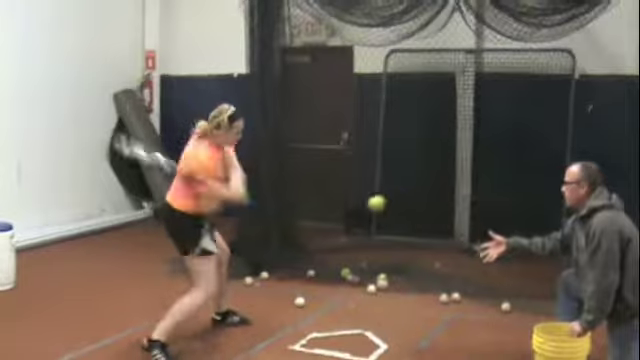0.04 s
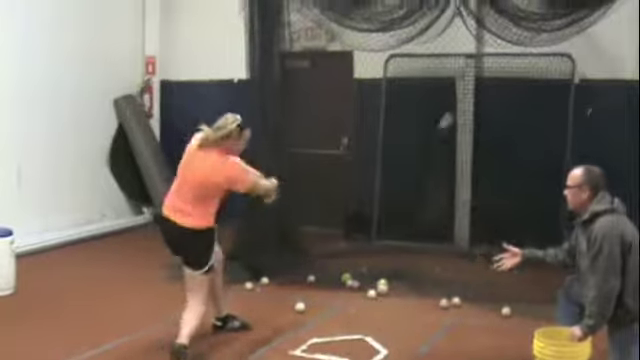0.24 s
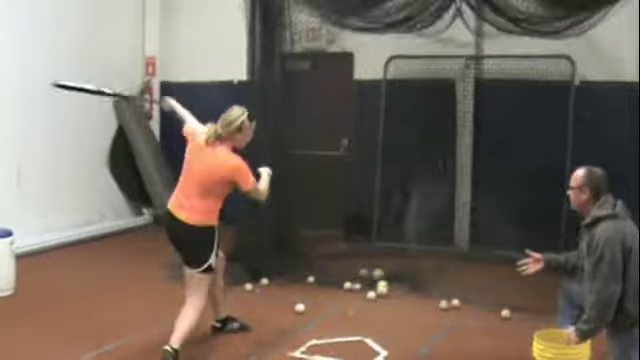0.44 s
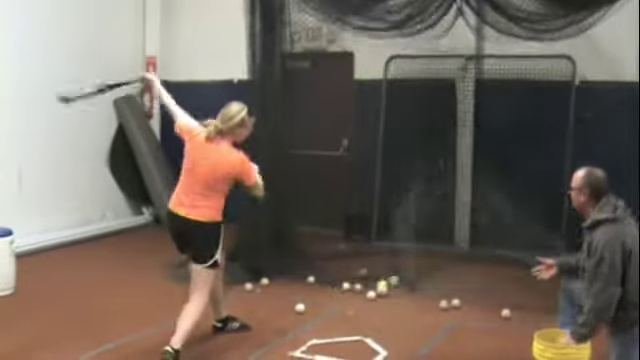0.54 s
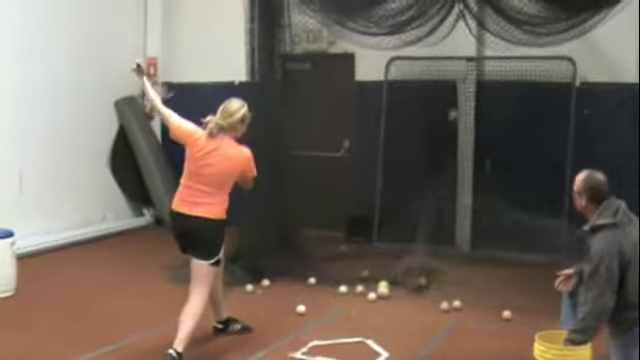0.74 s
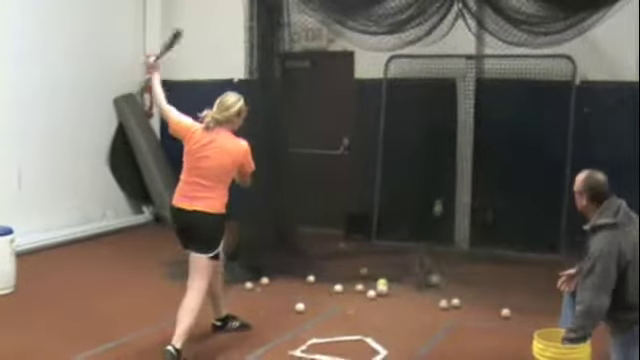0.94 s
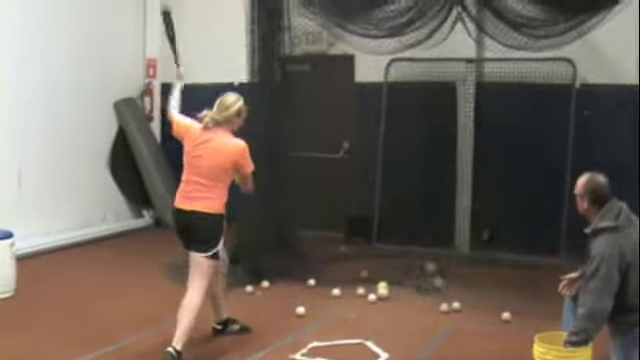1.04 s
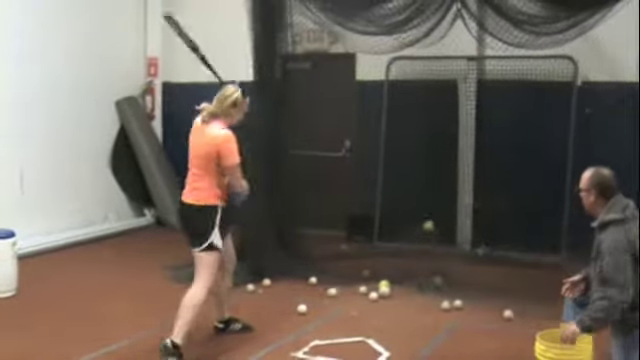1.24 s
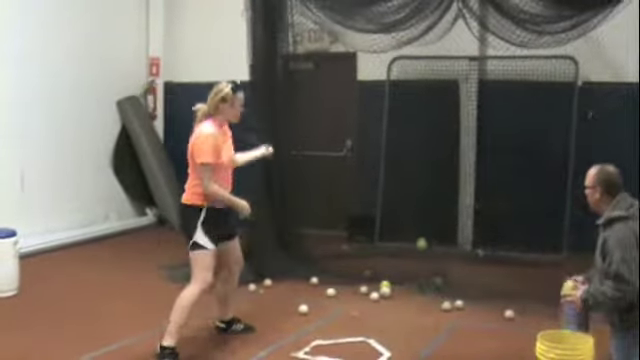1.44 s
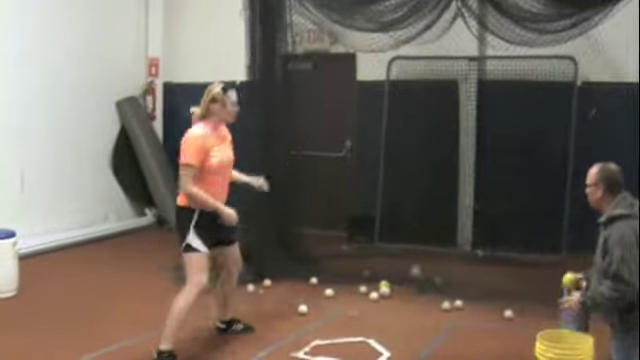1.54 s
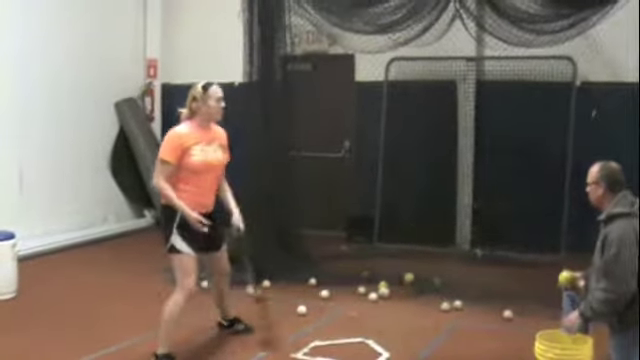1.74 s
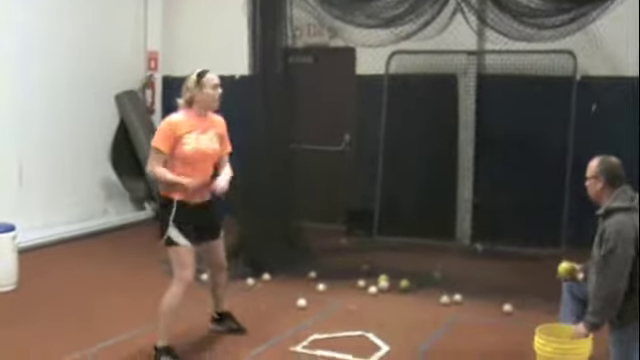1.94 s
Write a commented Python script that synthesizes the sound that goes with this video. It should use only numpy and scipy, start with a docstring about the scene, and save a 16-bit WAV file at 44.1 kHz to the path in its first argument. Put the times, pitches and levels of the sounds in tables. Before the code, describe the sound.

A loud metal bat crack hits a softball early on, ringing briefly and echoing through a large hard-walled hall; later the ball knocks on the floor, then bounces again more dully, over faint rustle and room tone.

```python
"""A bat cracks against a softball in a large, hard-walled batting hall.
The crack is a filtered click, the barrel's short ring a set of decaying sines; the hall, shaped noise
fading band by band, holds them for over a second, pressed flat by a fast limiter.
The ball bounces twice on the floor (thump, knock and tick), among soft thuds.
A faint rustle and steady room tone, both coloured noise, lie behind."""
import sys
import numpy as np
from scipy import signal
from scipy.fft import rfft, irfft
from scipy.io import wavfile
from scipy.ndimage import uniform_filter1d

SR = 44100
rng = np.random.default_rng(int(sys.argv[2]) if len(sys.argv) > 2 else 0)


def unload_audio(sound):
    """Save the sound as a 16-bit wav file, at the path given as the first command line argument."""
    columns = np.transpose(np.atleast_2d(sound))
    # keep every value between -1 and 1, then stretch to whole-number steps
    steps = np.round(np.clip(columns, -1, 1) * 32767)
    wavfile.write(sys.argv[1], SR, steps.astype(np.int16))


N = 88200

# Barrel modes. Each row: frequency in Hz, relative level in dB, t60 in s.
BARREL_MODES = [(645, 14, 0.057), (1100.5, 8, 0.064), (1172.6, 11, 0.046), (1732, 4, 0.012),
                (2375, 1.5, 0.014), (3287, 5.5, 0.01), (4580, -18, 0.0034), (5510, -1.5, 0.028),
                (6660, -14, 0.018), (8800, -5.5, 0.014)]
# Contact crack spectrum. Each row: frequency in Hz, relative level in dB.
CRACK_SPECTRUM = [(100, -36.5), (220, -15.5), (380, -8), (510, -9.5), (820, 2.5), (1450, -0.5),
                  (2800, -2.5), (4300, 0.5), (6500, -4), (9500, -7.5), (11500, -26), (16000, -31)]
# First reflections of the bat. Each row: delay in s, level in dB.
BAT_ECHOES = [(.009, -4.5), (.017, -14), (.0235, -11), (.028, -11)]
BARREL_LOW_CUT_HZ, CRACK_DB, CRACK_SPREAD_S = 540, 15, 0.00039
BAT_DIRECT_DB, BAT_HALL_DB = 4.5, 13.5


def bat():
    """The contact crack and the short ring of the barrel, thrown into the hall."""
    ring = cut(modes(BARREL_MODES), BARREL_LOW_CUT_HZ, "high", order=4)
    crack = amp(CRACK_DB) * click(CRACK_SPECTRUM)
    ring_paths = amp(BAT_DIRECT_DB) * reflections(0, BAT_ECHOES) + amp(BAT_HALL_DB) * hall()
    crack_near = reflections(0, BAT_ECHOES, CRACK_SPREAD_S)
    crack_paths = amp(BAT_DIRECT_DB) * crack_near + amp(BAT_HALL_DB) * hall()
    return through(ring, ring_paths) + through(crack, crack_paths)


def modes(table, size=4096):
    """A struck body: each mode is a sine losing 60 dB in its t60."""
    t = np.arange(size) / SR
    body = np.zeros(size)
    for hz, db, t60_s in table:
        decay = np.exp(-np.log(1000) * t / t60_s)
        body += amp(db) * unit(np.sin(2 * np.pi * hz * t) * decay)
    return body


# Hollow knock of ball on floor. Each row: frequency in Hz, relative level in dB.
KNOCK_SPECTRUM = [(60, -24), (150, -10.5), (310, 2.5), (430, -1.5), (680, 2.5), (900, -0.5), (1200, -1),
                  (1600, -11.5), (2400, -26.5), (3300, -22.5), (6000, -50), (16000, -83)]
# Gritty tick of the ball's cover on the floor. Each row: frequency in Hz, relative level in dB.
TICK_SPECTRUM = [(500, -27), (2400, -5), (4500, 4.5), (6800, 8), (9800, 2), (12000, -10), (16000, -37)]
# First reflections of a bounce, used by thumps too. Each row: delay in s, level in dB.
BOUNCE_ECHOES = [(.0074, -12), (0.0159, -3), (.0232, 1), (0.0379, -1.5), (.0455, -7), (0.051, -8)]
KNOCK_DULL_ABOVE_HZ, KNOCK_DIRECT_DB, KNOCK_HALL_DB = 880, -16, 10.5
TICK_DIRECT_DB, TICK_SCATTER_DB, TICK_HALL_DB, TICK_SPREAD_S = -29, -10, 9, 0.0011


def bounce(thump_db, knock_db, dull_db_per_octave, tick_db):
    """A thump, a hollow knock and a gritty tick; scattered echoes carry the last two into the hall."""
    colour = []
    for hz, db in KNOCK_SPECTRUM:
        octaves_above = max(np.log2(hz / KNOCK_DULL_ABOVE_HZ), 0)
        colour.append((hz, db - dull_db_per_octave * octaves_above))
    knock = amp(knock_db) * click(colour)
    tick = amp(tick_db) * click(TICK_SPECTRUM)

    near = scatter()
    knock_paths = reflections(KNOCK_DIRECT_DB, BOUNCE_ECHOES) + near
    knock_paths = knock_paths + amp(KNOCK_HALL_DB) * hall()
    tick_paths = reflections(TICK_DIRECT_DB, BOUNCE_ECHOES, TICK_SPREAD_S)
    tick_paths = tick_paths + amp(TICK_SCATTER_DB) * near + amp(TICK_HALL_DB) * hall()
    return thump(thump_db) + through(knock, knock_paths) + through(tick, tick_paths)


THUMP_HZ, THUMP_DECAY_S, THUMP_LOW_CUT_HZ = 157.3, 0.0017, 90.5
THUMP_ECHO_DB, THUMP_HALL_DB = -13.5, -6


def thump(db):
    """A soft weight pushes the floor: a brief low sine, its first echoes and the hall."""
    t = np.arange(N // 10) / SR
    swell = t * np.exp(-t / THUMP_DECAY_S)
    push = unit(cut(swell * np.sin(2 * np.pi * THUMP_HZ * t), THUMP_LOW_CUT_HZ, "high"))
    near = reflections(0, [(s, level + THUMP_ECHO_DB) for s, level in BOUNCE_ECHOES])
    return amp(db) * through(push, near + amp(THUMP_HALL_DB) * hall())


SCATTER_PER_S, SCATTER_RISE_S, SCATTER_T60_S, SCATTER_DB = 500, 0.018, 0.43, 6


def scatter():
    """Separate random echoes from walls and equipment around the landing spot, building then decaying."""
    t = np.arange(N) / SR
    taps = rng.random(N) < SCATTER_PER_S / SR
    rise = np.minimum(t / SCATTER_RISE_S, 1)
    decay = np.exp(-np.log(1000) * t / SCATTER_T60_S)
    return amp(SCATTER_DB) * unit(taps * rise * decay) * diffuse()


def reflections(direct_db, echoes, spread_s=0):
    """Direct path and single echoes from nearby surfaces, each a noise burst if spread_s is set."""
    taps, t = np.zeros((2, N)), np.arange(N // 100) / SR
    for s, db in [(0.00076, direct_db)] + list(echoes):
        shape = np.ones(1)
        if spread_s:
            shape = unit(rng.standard_normal(len(t)) * np.exp(-t / spread_s))
        add(taps, s, amp(db) * shape)
    return taps


# Hall decay. Each row: frequency in Hz, t60 in s.
HALL_DECAY = [(100, 2.27), (300, 1.69), (640, 1.84), (1150, 1.83), (2000, 1.6), (3500, 1.06), (5500, 0.79),
              (8500, 0.44), (15000, 0.62)]
# Diffuse waves from near and far walls. Each row: delay in s, rise in s, level in dB.
HALL_WAVES = [(.003, 0.0052, -6.5), (0.055, 0.0083, -6), (.2, 0.0075, -6)]
SURGE_DB, SURGE_DECAY_S = -3.5, 0.081


def hall():
    """Hall response: waves of diffuse sound overshoot and settle while each band decays at its own t60."""
    hz, frame_s, bins = signal.stft(diffuse(), SR, nperseg=256)
    decay = amp(-60 * frame_s / read(HALL_DECAY, hz)[:, None])
    tail = signal.istft(bins * decay, SR, nperseg=256)[1][:, :N]
    t, power = np.arange(N) / SR, np.zeros(N)
    for s, rise_s, db in HALL_WAVES:
        age = np.maximum(t - s, 0)
        surge = 1 + amp(SURGE_DB) ** 2 * np.exp(-age / SURGE_DECAY_S)
        power += amp(db) ** 2 * np.minimum(age / rise_s, 1) * surge
    # Energy is normalised with the decay at 1 kHz.
    fade = amp(-60 * t / read(HALL_DECAY, 1000))
    return tail * np.sqrt(power / np.sum(power * fade ** 2))


# Rustle level. Each row: time in s, level in dB.
RUSTLE_LEVEL = [(0, -57), (.08, -53.5), (.17, -54), (0.871, -58), (1.02, -47), (1.079, -49.5),
                (1.249, -47.5), (1.4, -43.5), (1.48, -46.5), (1.6, -56), (1.8, -55.5), (2, -52.5)]
# Rustle spectrum. Each row: frequency in Hz, relative level in dB.
RUSTLE_SPECTRUM = [(300, 2), (1200, -22.5), (3000, -2), (5800, -2), (8000, -9), (10000, -11), (12000, -9),
                   (16000, -17)]


def rustle():
    """Netting and clothes rub: coloured diffuse noise that swells and fades."""
    level_db = np.interp(np.arange(N) / SR, *np.transpose(RUSTLE_LEVEL))
    return diffuse(RUSTLE_SPECTRUM) * amp(level_db)


# Room tone spectrum. Each row: frequency in Hz, relative level in dB.
ROOM_SPECTRUM = [(25, 3.5), (50, 1), (120, 1.5), (250, -6), (600, -7), (1100, -6.5), (2000, -10.5),
                 (5000, -48.5), (10000, -34.5), (12000, -13), (15500, -18)]
ROOM_DB = -48


def room_tone():
    """Steady air noise of the hall, mostly low."""
    return amp(ROOM_DB) * diffuse(ROOM_SPECTRUM)


# Stereo width. Each row: frequency in Hz, side minus mid in dB.
STEREO_WIDTH = [(60, -26), (250, -12), (640, -8.5), (1200, -7), (2400, -8.5), (4400, -14.5), (9000, -12)]


def diffuse(colour=((1, 0), (SR, 0))):
    """Stereo noise of rms 1 from independent mid and side, so the channels partly agree."""
    hz = np.fft.rfftfreq(N, 1 / SR)
    mid, side = rfft(rng.standard_normal((2, N))) * amp(read(colour, hz))
    side = side * amp(read(STEREO_WIDTH, hz))
    both = irfft(np.array([mid + side, mid - side]), N)
    return both / both.std()


def click(colour, size=4096):
    """A causal, minimum-phase click of energy 1 with the given spectrum."""
    log_gain = np.log(amp(read(colour, abs(np.fft.fftfreq(size, 1 / SR)))))
    spectrum = np.exp(np.conj(signal.hilbert(log_gain)))
    return unit(np.fft.ifft(spectrum).real)


def through(sound, response):
    """Plays a mono sound through a stereo response."""
    return signal.fftconvolve(sound[None], response, axes=1)[:, :N]


def cut(x, hz, kind, order=2):
    """High-pass or low-pass Butterworth filter."""
    sos = signal.butter(order, min(hz, .45 * SR), kind, fs=SR, output="sos")
    return signal.sosfilt(sos, x)


def amp(db):
    """Decibels to gain."""
    return 10 ** (np.asarray(db) / 20)


def unit(x):
    """Scales a sound to energy 1."""
    return x / np.sqrt(np.sum(x ** 2) + 1e-20)


def read(points, hz):
    """Reads a table on a log-frequency axis."""
    f, value = np.transpose(points)
    return np.interp(np.log(hz + 1), np.log(f + 1), value)


def add(mix, s, sound):
    """Mixes a sound in at a time in seconds."""
    part = mix[..., max(round(s * SR), 0):][..., :sound.shape[-1]]
    part += sound[..., :part.shape[-1]]


HIT_S = .2174
# Ball bounces. Each row: start in s, thump in dB, knock in dB, knock dullness in dB per octave, tick in dB.
BOUNCES = [(1.1021, 4.5, 4.5, 0.5, -10.5), (1.6539, 0, -6, 10, -13.5)]
# Soft thuds. Each row: start in s, level in dB.
THUDS = [(0.203, -14), (.594, -11), (1.274, -8), (1.37, -30), (1.951, -9)]
# Stereo balance. Each row: frequency in Hz, left minus right in dB.
STEREO_BALANCE = [(60, 0.95), (200, 1.1), (1100, 1.8), (2400, .2), (4400, -0.44), (12000, -.3)]


def scene():
    """The hit, the bounces and the thuds over rustle and room tone, balanced left to right by band."""
    mix = room_tone() + rustle()
    add(mix, HIT_S, bat())
    for s, *blow in BOUNCES:
        add(mix, s, bounce(*blow))
    for s, db in THUDS:
        add(mix, s, thump(db))
    half_db = read(STEREO_BALANCE, np.fft.rfftfreq(2 * N, 1 / SR)) / 2
    return irfft(rfft(mix, 2 * N) * amp([half_db, -half_db]))[:, :N]


# Microphone treble roll-off. Each row: frequency in Hz, gain in dB.
MIC_RESPONSE = [(9500, 0), (10700, -6), (11800, -19.5), (14000, -18), (15500, -11)]
LIMIT_DB, RATIO, SENSE_S, SENSED_FALL_DB_PER_S = -13.5, 18, 0.0026, 93
CEILING, BAND_EDGE_HZ = 0.42, 15900


def record(dry):
    """A fast limiter with slower recovery, soft overload, dull top octave and a band limit."""
    keep = np.exp(-1 / (SENSE_S * SR))
    power = signal.lfilter([1 - keep], [1, -keep], (dry ** 2).mean(0))
    power_db = 10 * np.log10(power + 1e-12)
    # The sensed level follows rises at once and falls no faster than a straight line in dB.
    fall_db = np.arange(N) / SR * SENSED_FALL_DB_PER_S
    sensed_db = np.maximum.accumulate(power_db + fall_db) - fall_db
    over_db = np.maximum(sensed_db - LIMIT_DB, 0)
    held = dry * amp(-over_db * (1 - 1 / RATIO))
    held = held / (1 + (held / CEILING) ** 8) ** (1 / 8)
    mic_gain = amp(read(MIC_RESPONSE, np.fft.rfftfreq(2 * N, 1 / SR)))
    dulled = irfft(rfft(held, 2 * N) * mic_gain)[:, :N]
    band_limit = signal.firwin(511, BAND_EDGE_HZ, window=("kaiser", 9), fs=SR)
    return signal.oaconvolve(dulled, band_limit[None], "same")


dry = scene()
out = record(dry)
unload_audio(out)
```